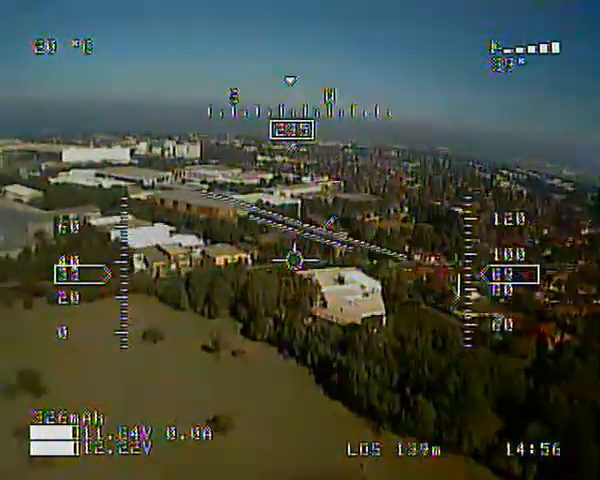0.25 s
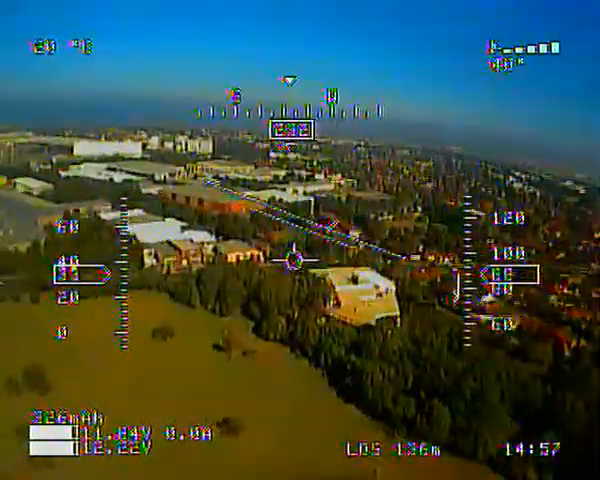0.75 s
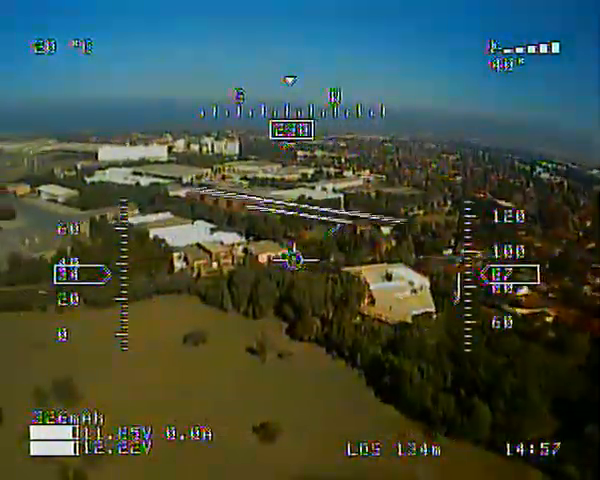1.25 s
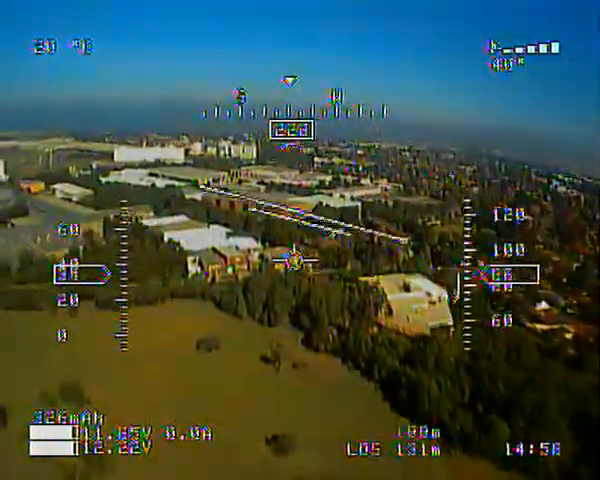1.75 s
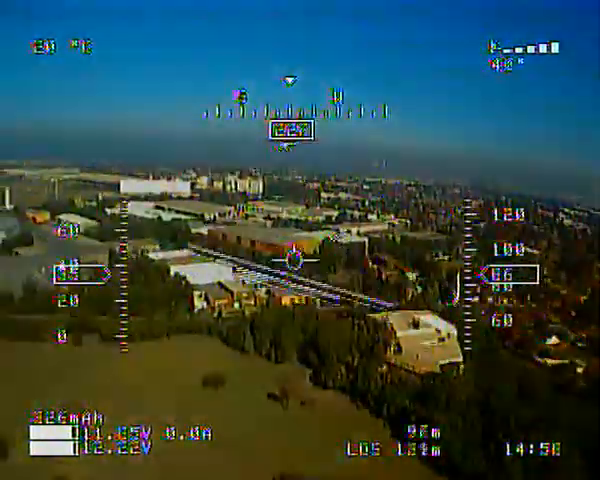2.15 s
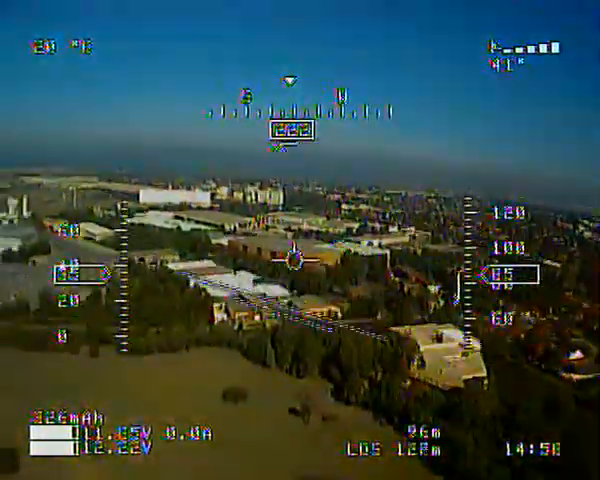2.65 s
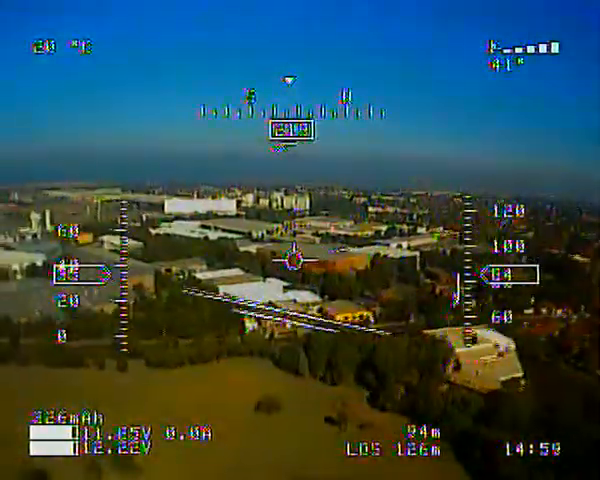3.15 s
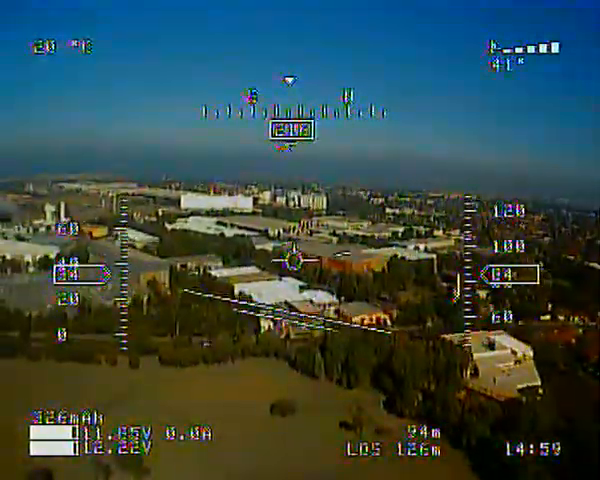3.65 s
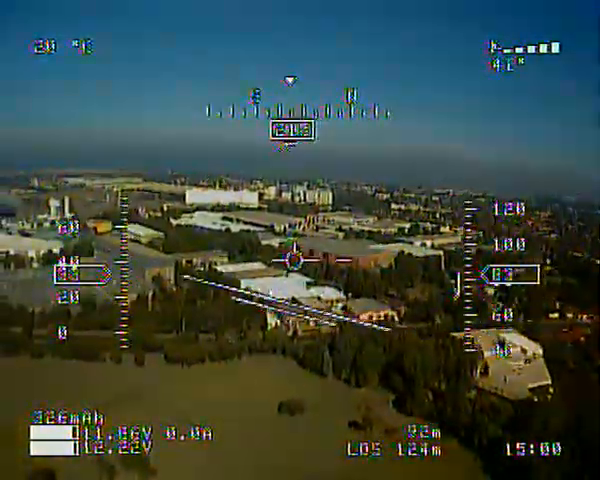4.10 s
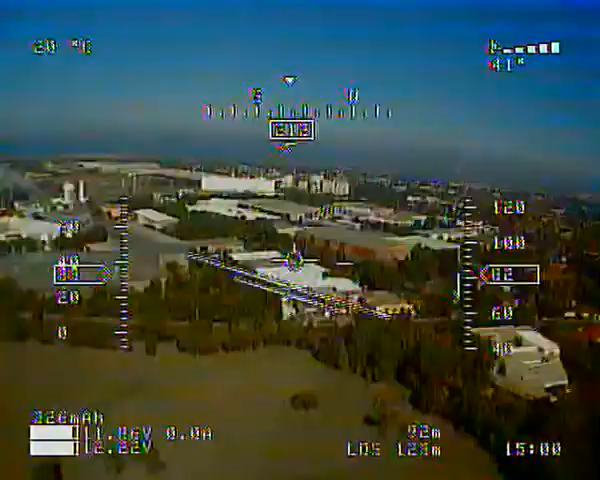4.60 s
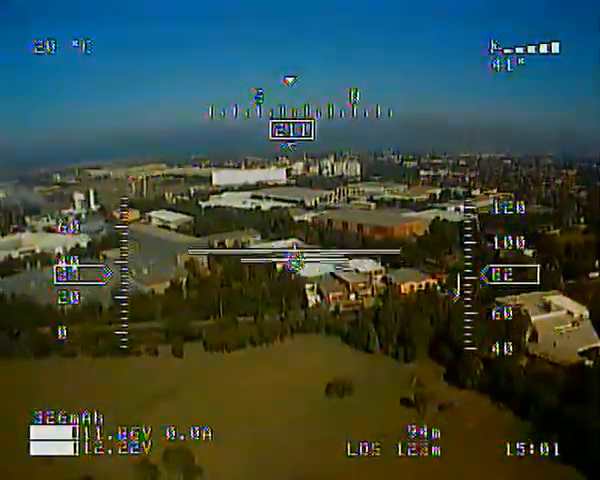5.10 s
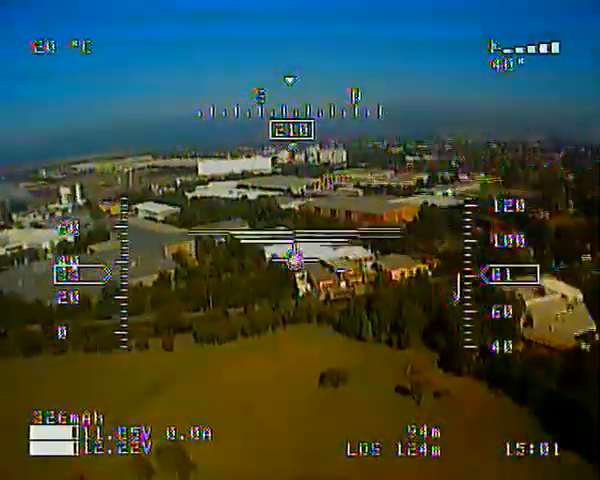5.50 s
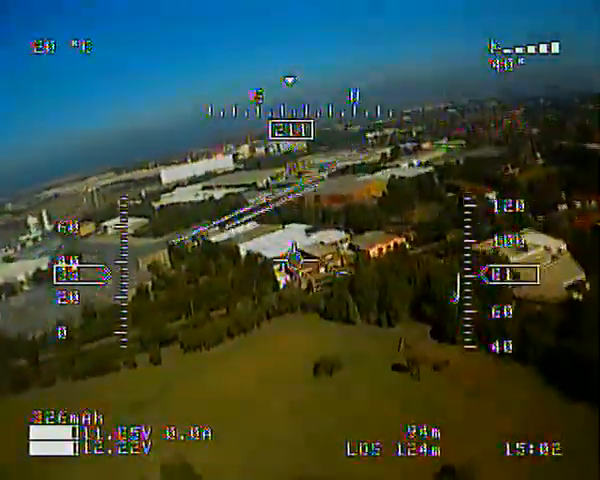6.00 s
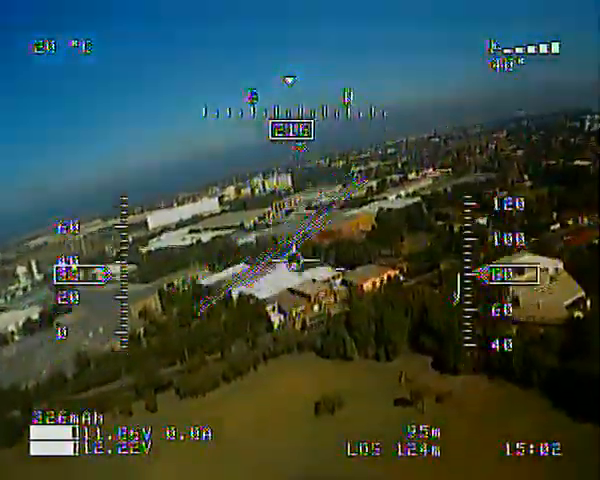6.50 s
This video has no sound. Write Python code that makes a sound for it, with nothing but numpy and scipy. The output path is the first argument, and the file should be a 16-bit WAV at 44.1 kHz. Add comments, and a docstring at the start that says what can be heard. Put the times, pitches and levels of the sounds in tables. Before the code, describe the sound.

Constant rough air rush over an exposed onboard microphone, muffled in treble, with thumping gusts on the right and faint flickering hiss on the left.

```python
"""Aloft on a small gliding model plane, motor off, with air rushing over a microphone on board.
Large eddies buffet it, small ones tear and hiss in bursts: shaped noises that follow one turbulent flow.
Brief rises of noise, strongest near 850 Hz, stand out of the wind, and its highest peaks overload the amplifier.
The wind is on the right channel only; the left carries faint hiss that flickers up.
The narrow-band radio link cuts the treble of both."""
import sys
import numpy as np
from scipy import signal
from scipy.fft import rfft, irfft, next_fast_len
from scipy.io import wavfile
from scipy.ndimage import uniform_filter1d

SR = 44100
rng = np.random.default_rng(int(sys.argv[2]) if len(sys.argv) > 2 else 0)


def to_wav(sig):
    """Store sig (one row per channel, or 1-D mono) as 16-bit WAV at the path in sys.argv[1].

    Samples outside -1..1 are clipped; the rate is SR.
    """
    pcm = np.clip(np.atleast_2d(sig), -1, 1) * 32767
    pcm = np.round(pcm).astype(np.int16)
    wavfile.write(sys.argv[1], SR, pcm.T)  # frames by channels


N = 298116
TIME = np.arange(N) / SR


def undb(db):
    """Decibels to gain."""
    return 10 ** (np.asarray(db) / 20)


def unit(x):
    """Scale to rms 1."""
    return x / np.sqrt(np.mean(x ** 2))


def colour(x, points):
    """Filter by a spectrum of (f/Hz, level/dB) points joined on a log-frequency axis."""
    hz, db = np.transpose(points)
    size = next_fast_len(N + 4096)
    bins = np.maximum(np.arange(size // 2 + 1) * SR / size, 1)
    gain = undb(np.interp(np.log(bins), np.log(hz), db))
    return irfft(rfft(x, size) * gain, size)[:N]


def noise(points):
    """Noise of rms 1 with the given spectrum shape."""
    return unit(colour(rng.standard_normal(N), points))


def curve(points):
    """Straight lines through (t/s, level/dB) points, at every sample."""
    return np.interp(TIME, *np.transpose(points))


def walk(rate):
    """Smooth random wandering of rms 1 that takes a new direction about rate times a second."""
    steps = rng.standard_normal(N // 16)
    path = np.interp(TIME * rate, np.arange(len(steps)), steps)
    return unit(uniform_filter1d(path, max(int(SR / rate / 2), 1)))


def bump(at, half_length):
    """A smooth rise and fall of height 1 around a moment; half_length reaches down to 1/e."""
    return np.exp(-((TIME - at) / half_length) ** 2)


# idle left channel, spectrum shape of the faint hiss: f/Hz, relative level/dB
IDLE_SPECTRUM = [(30, -10), (150, -1), (900, -2), (4000, -12), (7000, -12), (8000, -40)]
# moments when that hiss flickers up: t/s, half length/s, level/dB
HISS_FLICKERS = [(0.235, 0.036, -40.8), (0.39, 0.054, -41.5), (0.514, 0.029, -44.6), (0.747, 0.032, -42.7),
                 (0.93, 0.032, -46), (1.861, 0.031, -42), (2.65, 0.032, -48.5), (2.999, 0.044, -44),
                 (3.348, 0.033, -47), (3.442, 0.027, -44.5), (3.65, 0.048, -44.4), (3.904, 0.028, -46.9),
                 (4.554, 0.031, -47), (4.693, 0.032, -42.5), (5.232, 0.052, -43), (5.435, 0.033, -43),
                 (5.527, 0.03, -44.8), (6.409, 0.029, -53), (6.505, 0.026, -46), (6.646, 0.03, -54)]
IDLE_DB = -51.5  # steady level, ahead of the link


def idle_hiss(waver_db=0.5):
    """Faint wavering noise of the idle channel, raised briefly by flat-topped flickers."""
    steady = undb(IDLE_DB + waver_db * walk(rate=14))
    # the fourth power makes the tops flat and the sides steep
    flickers = sum(undb(db) * np.exp(-((TIME - at) / half) ** 4) for at, half, db in HISS_FLICKERS)
    return noise(IDLE_SPECTRUM) * (steady + flickers)


# brief rises of noise in the wind: t/s, level/dB
NOISE_BURSTS = [(1.171, -17), (1.969, -14), (2.2155, -7.5), (2.476, -13.5), (3.088, -16), (3.632, -12),
                (5.884, -14.5), (6.160, -15), (6.526, -11.5)]
BURST_S = 0.003  # half length of a noise burst


def noise_bursts():
    """Brief rises of noise in the wind, strongest near 850 Hz."""
    strength = sum(undb(db) * bump(at, BURST_S) for at, db in NOISE_BURSTS)
    return strength * noise([(200, -10.0), (850, 12.5), (3000, -11.5), (7000, -18.0)])


# slow swells of the airflow at the microphone, about its cruising value: t/s, level/dB
FLOW_SWELLS = [(0.0, 3), (0.06, 2.2), (0.2, 4), (0.39, 2.5), (0.44, -1.6), (0.56, 0), (0.68, -1),
               (0.9, 0.5), (1.08, 0.9), (1.22, 4), (1.38, 3.5), (1.55, 0.5), (1.83, 4.5), (1.9, 2.5),
               (2.05, 2.5), (2.3, 1), (2.45, 0.5), (2.7, -2), (2.92, -1.3), (3.17, -0.7), (3.42, 0.5),
               (3.56, -1.3), (3.85, -0.3), (4.02, -2), (4.36, -2), (4.66, 1.8), (4.85, 1), (5.15, 1.5),
               (5.44, 3), (5.51, -0.7), (5.77, -3.5), (5.95, -3), (6.07, -0.3), (6.3, -2.5), (6.4, -2),
               (6.56, -3), (6.76, -3)]
# short gusts the plane flies through: t/s, half length/s, flow rise/dB, extra thump in the rush/dB
SHORT_GUSTS = [(0.27, 0.022, -0.5, 2), (0.686, 0.01, 4.5, 0), (0.755, 0.016, 4.5, 1),
               (1.048, 0.013, 2, 0.5), (1.191, 0.011, 1, 5.5), (1.475, 0.013, 2, 0), (1.649, 0.026, 1.5, 3),
               (1.773, 0.012, -1, 4), (2.206, 0.019, 4, -4), (2.483, 0.011, -1, 3), (2.545, 0.015, -1.5, 0),
               (2.844, 0.02, 1.5, 3.5), (2.964, 0.013, 1, 3), (3.039, 0.02, 1.5, 1.8),
               (3.328, 0.026, 2.5, 2), (3.497, 0.046, 2, 3), (3.642, 0.015, 4, -2), (3.81, 0.017, 1, 1.3),
               (4.13, 0.027, 3, -1.3), (4.285, 0.016, 4.5, 1), (4.718, 0.019, 2.5, -6.5),
               (4.945, 0.024, 1.5, 2.5), (5.094, 0.02, 3.3, -6), (5.162, 0.017, -1.5, 6.5),
               (5.43, 0.019, -1, 5.5), (5.602, 0.012, 4.5, 1), (5.958, 0.012, 1.3, 3),
               (6.084, 0.019, 1.5, 2.5), (6.17, 0.013, 2, 3), (6.27, 0.035, 2.5, 2.5),
               (6.351, 0.016, 2.2, -3), (6.529, 0.013, 2.5, -2)]
# pockets of calmer air: t/s, flow change/dB
CALM_POCKETS = [(0.902, -3.0), (1.087, -0.5), (1.946, -3.6), (2.442, -3.5), (3.089, -2.5), (4.052, -1.7),
                (4.215, -1.5), (5.334, -0.5), (6.403, -3), (6.681, -1.7)]
LULL_S = 0.018  # half length of a lull
DIP_DB, DIP_S = -2, 0.0064  # depth of a dip; its half length, also its lead on the noise burst
FLUTTER_DB, FLUTTER_PER_S = 0.43, 30


def airflow():
    """Flow strength in dB: slow swells, gusts, lulls, slight flutter, a brief dip just before each noise burst."""
    gusts = sum(rise_db * bump(at, half) for at, half, rise_db, _ in SHORT_GUSTS)
    lulls = sum(db * bump(at, LULL_S) for at, db in CALM_POCKETS)
    dips = DIP_DB * sum(bump(at - DIP_S, DIP_S) for at, _ in NOISE_BURSTS)
    flutter = FLUTTER_DB * walk(rate=FLUTTER_PER_S)
    return curve(FLOW_SWELLS) + gusts + lulls + dips + flutter


def turbulence(swirl_db, burst_db, flick_db, limit_db=12.0):
    """Fast unrest of the flow in dB: swirls, quicker bursts and still quicker flicks added together."""
    db = swirl_db * walk(rate=95) + burst_db * walk(rate=380) + flick_db * walk(rate=1100)
    # no burst grows without bound
    db = np.where(db > 0, limit_db * np.tanh(db / limit_db), db)
    # take off the running mean, so that slower changes are left to the airflow
    return db - uniform_filter1d(db, size=SR // 22)


# four sizes of eddy at the microphone, spectrum shapes: f/Hz, relative level/dB
BUFFET_SPECTRUM = [(20, -36), (32, -30.5), (50, -16), (75, -8), (135, -3), (210, -2.5), (400, -4.5),
                   (900, -33.5)]  # slow pressure swings of the airframe's wake
RUSH_SPECTRUM = [(40, -34), (120, -23), (250, -1.5), (400, 1), (550, 2.05), (780, 0.2), (1080, -7.5),
                 (1600, -20), (3000, -23), (7000, -56.5)]  # the main rush of air over the opening
EDDY_SPECTRUM = [(150, -20), (600, -1.5), (1100, 2.5), (1500, -1.2), (2100, -7.5), (3100, -16), (4900, -19),
                 (7000, -30)]  # small eddies torn off the edges
SPIT_SPECTRUM = [(800, -13), (1900, 4.5), (3200, 2), (5000, -6.5), (7000, -9)]  # the finest eddies, a spitting hiss
# low roar (buffet and rush) against the rest of the wind: t/s, level/dB
ROAR_LEVEL = [(0.0, -1.5), (0.4, 0.8), (0.8, 1.5), (1.6, 0.6), (2.3, 0.7), (2.7, 0.5), (3.0, 0.4),
              (4.45, -0.5), (4.72, -0.5), (5.35, -1.5), (5.65, 1.5), (6.76, -0.3)]
# treble hiss (spit) against the rest of the wind: t/s, level/dB
TREBLE_LEVEL = [(0, 0.5), (1.4, 0.7), (2.4, 0), (3.4, -1), (4.5, -0.4), (5.4, 0.2), (6.0, 1.8),
                (6.76, -1.7)]
TEAR_LEAD_S = 0.00046  # fine eddies tear off this long before a pressure crest


def wind(buffet_db=-21.0, rush_db=-18.5, eddy_db=-22.0, spit_db=-30.7,
         buffet_growth=0.26, rush_growth=0.8, eddy_growth=1.27, spit_growth=0.82,
         rush_follow=0.78, spit_follow=0.36, crest_db=1.3):
    """Four sizes of eddy share one flow, each growing with it at its own rate (dB per dB), plus noise bursts."""
    flow_db = airflow()
    surge_db = turbulence(swirl_db=1.2, burst_db=2.0, flick_db=1.1)
    roar_db = curve(ROAR_LEVEL)
    thump_db = sum(db * bump(at, half) for at, half, _, db in SHORT_GUSTS)

    buffet = noise(BUFFET_SPECTRUM) * undb(buffet_db + buffet_growth * flow_db + roar_db)

    pressure = noise(RUSH_SPECTRUM)
    surging_rush = unit(pressure * undb(rush_follow * surge_db))
    rush = surging_rush * undb(rush_db + rush_growth * flow_db + roar_db + thump_db)

    surging_eddies = unit(noise(EDDY_SPECTRUM) * undb(surge_db))
    eddies = surging_eddies * undb(eddy_db + eddy_growth * flow_db)

    # the finest eddies tear off just ahead of each pressure crest, and also break up on their own
    tear_db = crest_db * np.interp(TIME + TEAR_LEAD_S, TIME, pressure)
    breakup_db = turbulence(swirl_db=1.0, burst_db=2.5, flick_db=5.0)
    spatter = rng.standard_normal(N) * undb(spit_follow * surge_db + tear_db + breakup_db)
    spit_level_db = spit_db + spit_growth * flow_db + curve(TREBLE_LEVEL)
    spit = unit(colour(spatter, SPIT_SPECTRUM)) * undb(spit_level_db)
    return buffet + rush + eddies + spit + noise_bursts()


def scene():
    """Idle hiss on the left channel, wind at the microphone on the right."""
    return np.array([idle_hiss(), wind()])


def overload(x, ceiling, floor, knee, bend):
    """The microphone amplifier bends the wave a little and runs out of swing, sooner upwards than downwards."""
    x = x + bend * x ** 2
    limit = np.where(x > 0, ceiling, floor)
    return x / (1 + np.abs(x / limit) ** knee) ** (1 / knee)


# response of the radio link, mainly in the treble: f/Hz, level/dB
LINK_RESPONSE = [(4300, 0.5), (5020, 1.6), (5350, -3), (6250, -1), (6800, -6.5), (7300, -16.5)]
TOP_HZ = 7400  # upper edge of the link


def record(dry):
    """The amplifier flattens the wind's peaks and thins its deepest bass; the link colours and cuts the treble."""
    hiss, air = dry
    air = overload(air, ceiling=.52, floor=.63, knee=10, bend=.1)
    air = signal.sosfilt(signal.butter(1, 15, "high", fs=SR, output="sos"), air)
    channels = [colour(hiss, LINK_RESPONSE), colour(air, LINK_RESPONSE)]
    steep_cut = signal.ellip(10, .1, 80, TOP_HZ, fs=SR, output="sos")
    return signal.sosfilt(steep_cut, channels)


dry = scene()
out = record(dry)
to_wav(out)
```